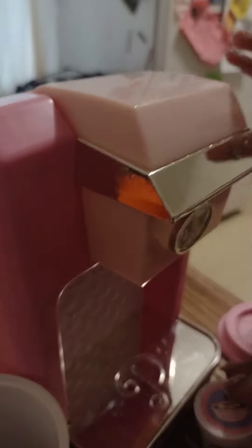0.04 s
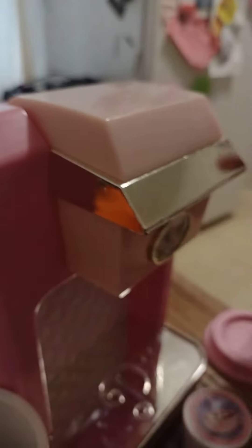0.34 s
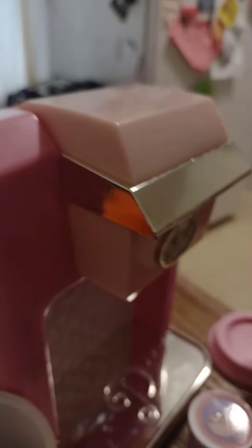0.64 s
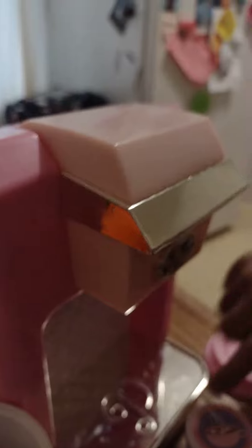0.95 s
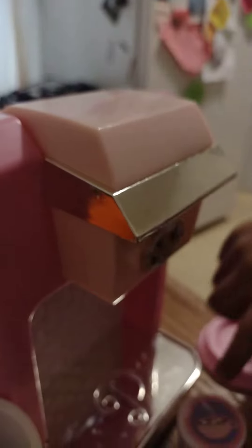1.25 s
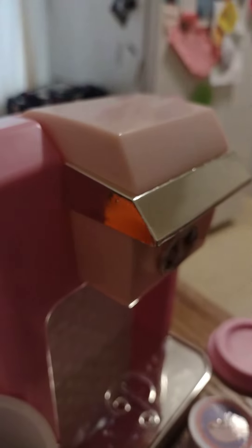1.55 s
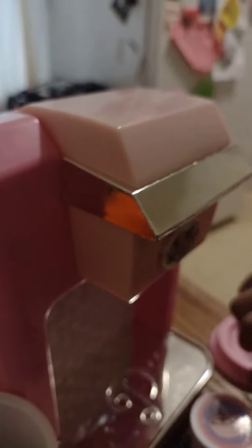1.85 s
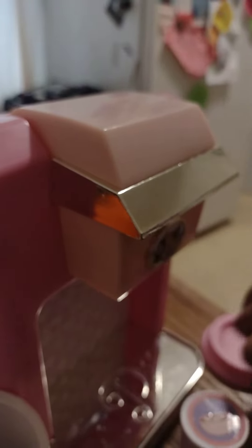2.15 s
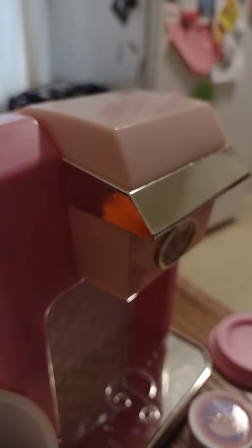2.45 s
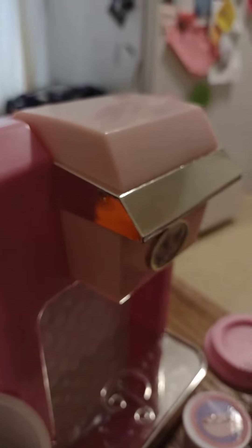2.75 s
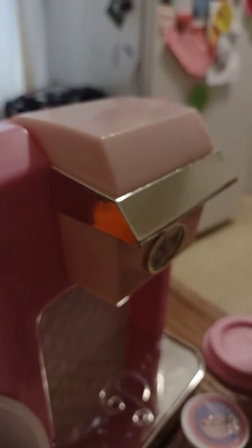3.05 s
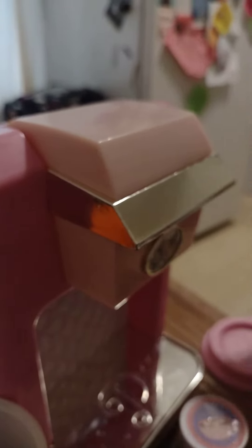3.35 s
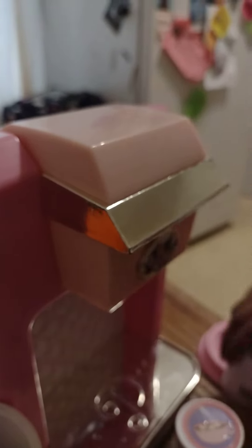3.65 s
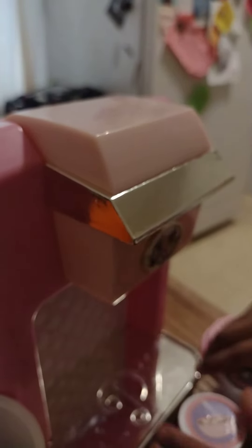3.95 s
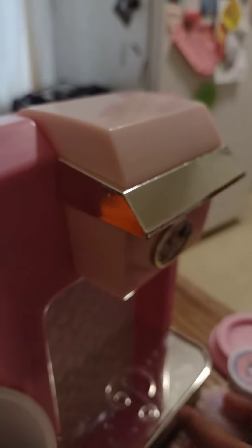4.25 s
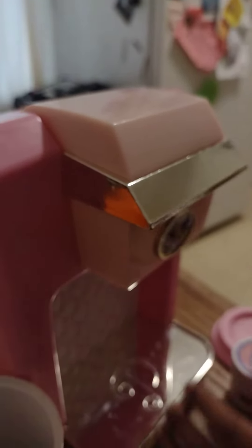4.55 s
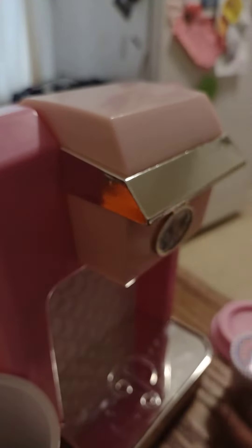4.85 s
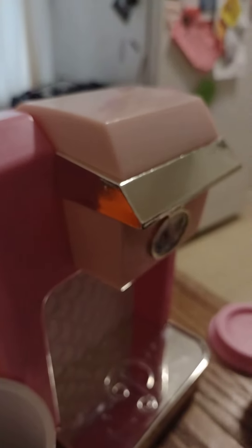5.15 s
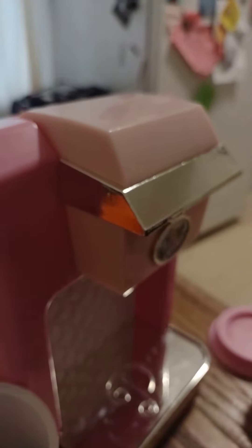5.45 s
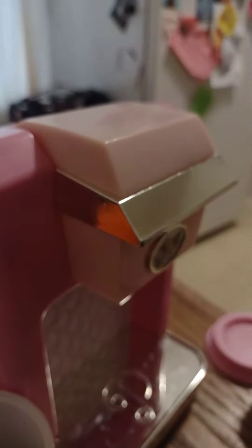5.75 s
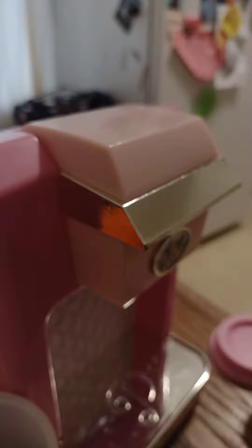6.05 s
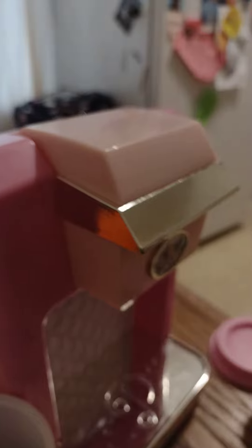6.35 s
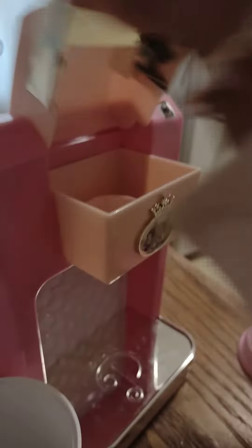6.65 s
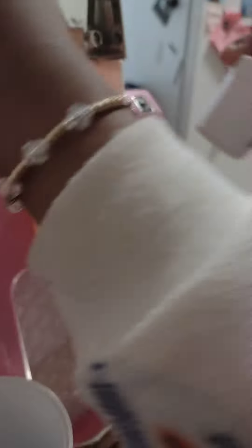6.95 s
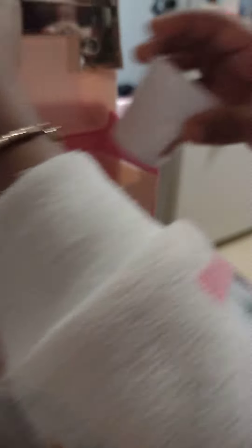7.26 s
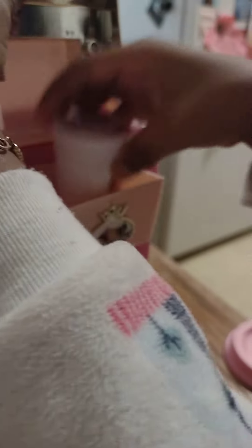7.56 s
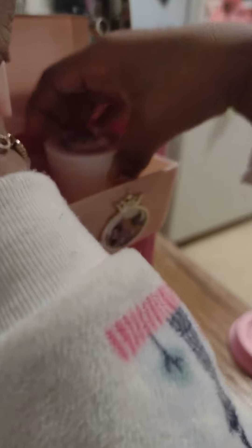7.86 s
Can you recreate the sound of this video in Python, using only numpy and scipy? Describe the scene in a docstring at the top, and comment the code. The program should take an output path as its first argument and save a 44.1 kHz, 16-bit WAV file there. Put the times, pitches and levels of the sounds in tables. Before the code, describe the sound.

An appliance hums faintly in a small kitchen while light taps land on a plastic coffee machine. Hard plastic pods then clatter in a hand, one clicks on a lid, and they bounce sharply on a wooden table as a hand bumps and drags close to the microphone. After a brief dropout, dull knocks sound in the machine's hollow holder, and a pod clicks on the rim and slides in.

```python
"""An appliance hums faintly while light taps land on a small plastic coffee machine and a sleeve brushes by.
After four seconds hard plastic pods clatter in a hand, one clicks on a lid, and they bounce on a wooden
table as the hand bumps and drags close by. Each hit is a short crack, most with a brief ring, echoing in
a small kitchen. Near seven seconds all sound drops out for a moment. Last come dull knocks in the
machine's hollow holder, and a pod clicks on its rim and slides in."""
import sys
import numpy as np
from scipy import signal
from scipy.fft import rfft, irfft, next_fast_len
from scipy.io import wavfile
from scipy.ndimage import uniform_filter1d, map_coordinates

SR = 44100
rng = np.random.default_rng(int(sys.argv[2]) if len(sys.argv) > 2 else 0)


def unload_audio(sound):
    """Save the sound as a 16-bit wav file, at the path given as the first command line argument."""
    columns = np.transpose(np.atleast_2d(sound))
    # keep every value between -1 and 1, then stretch to whole-number steps
    steps = np.round(np.clip(columns, -1, 1) * 32767)
    wavfile.write(sys.argv[1], SR, steps.astype(np.int16))


N = 352976

# pods hitting each other: (time [s], level [dB], brightness [dB/octave], clink pitch [Hz], clink [dB])
POD_HITS = [(4.336, -32, 2, 4120, -52.5), (4.381, -39, -0.5, 4130, -61), (4.415, -47, -2, 4150, -61),
            (4.457, -15.5, -2, 4930, -36), (4.519, -13.5, -0.5, 4300, -34.5),
            (4.531, -14.5, -3.5, 4300, -45), (4.586, -15, -3.5, 4310, -46), (4.613, -11.5, -2, 4960, -41),
            (4.636, -19, -3.5, 4130, -47), (4.657, -17.5, -4, 4900, -36.5), (4.684, -18.5, -4, 4950, -47),
            (4.698, -22.5, -5, 4300, -58), (4.764, -38.5, -1, 4950, -65), (4.791, -41, 14, 7150, -64)]
# tone colour of a hit on the table: (frequency [Hz], level [dB])
TABLE_COLOUR = [(50, -28.5), (90, -16), (180, -14.5), (400, -6.5), (900, 0), (1300, 0.5), (1900, 0.5),
                (2700, -8.5), (4150, -11), (5000, -13.5), (6000, -18), (7100, -11), (8400, -32.5)]


def amp(db):
    """Turn decibels into a gain."""
    return 10 ** (np.asarray(db) / 20)


def unit(x):
    """Scale a sound to an average (rms) level of 1."""
    return x / np.sqrt(np.mean(x ** 2) + 1e-20)


def along(points, hz):
    """Read between (frequency, value) points on a log frequency axis."""
    freqs, values = np.transpose(points)
    return np.interp(np.log(hz + 1), np.log(freqs + 1), values)


def wobble(rate):
    """A smooth curve through rate random values a second."""
    return map_coordinates(rng.standard_normal(int(N * rate / SR) + 4), [np.arange(N) * rate / SR])


def filtered(x, response):
    """Turn each frequency up or down by its own gain."""
    size = next_fast_len(N + SR // 2)
    return irfft(rfft(x, size) * response(np.fft.rfftfreq(size, 1 / SR)), size)[:N]


def coloured(x, colour):
    """Give a sound a tone colour, at average level 1."""
    return unit(filtered(x, lambda hz: amp(along(colour, hz))))


def add(out, s, sound):
    """Mix a sound into out at s seconds."""
    out[max(round(s * SR), 0):][:len(sound)] += sound


def narrow_noise(centre_hz, width_hz):
    """Noise squeezed around one pitch: a fuzzy tone."""
    noise = rng.standard_normal(N)
    return unit(filtered(noise, lambda hz: 1 / (1 + (2 * (hz - centre_hz) / width_hz) ** 2)))


def appliance(air_db=-66, waver_db=-1.27, drift_radians=0.087):
    """A slightly unsteady electric hum and a fuzzy whine over the soft rush of the room."""
    # steady tones: the mains hum and two high lines of the whine: (pitch [Hz], level [dB])
    hum_tones = [(59.2, -63), (118.4, -75), (296.1, -87.5), (354, -64.5), (412.5, -66.5), (468.3, -82.5),
                 (2708, -88), (2767, -94.5)]
    # tones of the whine: (pitch [Hz], width [Hz], level [dB])
    whine_tones = [(2090, 50, -91.5), (4820, 70, -94), (5000, 30, -94)]
    # colour of the room's rush: (frequency [Hz], level [dB])
    air_colour = [(20, -40.5), (35, -23), (60, -4), (110, -13), (260, -10), (400, -15), (470, -16.5),
                  (600, -20.5), (1600, -28.5), (2300, -34), (4000, -34.5), (5000, -33.5), (7000, -34),
                  (8400, -46.5)]
    t = np.arange(N) / SR
    hum = np.zeros(N)
    for hz, db in hum_tones:
        level = amp(db + waver_db * wobble(12))
        hum += level * np.sin(2 * np.pi * (hz * t + rng.random()) + drift_radians * wobble(1.1))
    whine = sum(amp(db) * narrow_noise(hz, width_hz) for hz, width_hz, db in whine_tones)
    return np.sqrt(2) * hum + whine + amp(air_db) * coloured(rng.standard_normal(N), air_colour)


def lead_in(pulse, length_s):
    """A faint, very short swell of noise leads into each hit."""
    t = np.arange(SR // 50) / SR
    swell = signal.fftconvolve(rng.standard_normal(len(t)) * t * (t < length_s), pulse)
    return swell / np.linalg.norm(swell)


def crack(colour, tilt_db, size=4096):
    """The sharp pulse of one hit; tilt_db brightens it by that much per octave."""
    hz = np.fft.rfftfreq(size, 1 / SR)
    octaves = np.log2(np.clip(hz, 200, 8000) / 1500)
    level = np.maximum(along(colour, hz), -50) + tilt_db * octaves
    # keep the colour but pack the energy at the start (minimum phase)
    cepstrum = irfft(np.log(amp(level)))
    cepstrum[1:size // 2] *= 2
    cepstrum[size // 2 + 1:] = 0
    pulse = irfft(np.exp(rfft(cepstrum)))
    return pulse / np.linalg.norm(pulse)


def ringing(tones, t, tilt_db=0, scatter_db=1.0, blur_hz=20):
    """Each tone fades 60 dB in its ring time, t60, and is a little fuzzy, like a ring heard in a room."""
    ring = np.zeros(len(t))
    for hz, db, t60 in tones:
        blur = np.cumsum(rng.standard_normal(len(t))) * np.sqrt(2 * np.pi * blur_hz / SR)
        tone = np.sin(2 * np.pi * hz * t + blur) * amp(-60 * t / t60) * (1 - np.exp(-t / .001))
        strength = amp(db + tilt_db * np.log2(hz / 1500) + scatter_db * rng.standard_normal())
        ring += strength * tone / np.linalg.norm(tone)
    return ring


def surfaces(spread_s=0.013, strength=0.11, count=7):
    """Sound arrives directly, then as a few quick echoes off the table top and the machine."""
    paths = np.zeros(SR // 20)
    paths[0] = 1
    delays = rng.uniform(.1, 1, count) * spread_s
    paths[(delays * SR).astype(int)] += strength * rng.choice([-1, 1], count)
    return paths / np.linalg.norm(paths)


def kitchen(build_up_s=0.00049, early_t60=0.11):
    """Dense echoes: near walls answer briefly, then the room, where the treble dies first."""
    # how long the room echoes: (frequency [Hz], time to fade 60 dB [s])
    echo_times = [(150, 0.32), (450, 0.38), (1100, 0.29), (2700, 0.32), (7200, 0.25)]
    hz, t, noise = signal.stft(rng.standard_normal(SR // 2), SR, nperseg=256)
    fade = np.hypot(amp(-60 * t / along(echo_times, hz)[:, None]), amp(-60 * t / early_t60))
    tail = signal.istft(noise * fade * (1 - np.exp(-t / build_up_s)), SR, nperseg=256)[1]
    return tail / np.linalg.norm(tail)


def contacts(hits, colour, tones, gain_db, room_db, ring_db=0, chatter=.15, chatter_t60=.008,
             room_growth=0, crisp_db=0, detune=0, lead_in_s=0.0016, lead_in_db=-20):
    """Each hit cracks, rings its object's tones and echoes; crisp_db brightens the direct part."""
    out, t = np.zeros(N + 2 * SR), np.arange(SR // 2) / SR
    nearby = surfaces()
    hardest_db = max(row[1] for row in hits)
    for (s, db, tilt_db, *_), echo_db in zip(hits, np.broadcast_to(room_db, len(hits))):
        pulse = crack(colour, tilt_db)
        # thin walls chatter as they meet
        force = chatter * rng.standard_normal(len(t)) * amp(-60 * t / chatter_t60)
        force[0] += 1
        direct = signal.fftconvolve(force, crack(colour, tilt_db + crisp_db))[:len(t)]
        # a hard blow shakes its surroundings more
        hit = amp(echo_db + room_growth * (db - hardest_db)) * signal.fftconvolve(pulse, kitchen())
        hit[:len(t)] += direct / np.linalg.norm(direct)
        hit = signal.fftconvolve(hit, nearby)
        # detune shifts the pitches from hit to hit; a soft hit rings the high tones less
        retuned = [(hz * (1 + detune * rng.standard_normal()), level, t60) for hz, level, t60 in tones]
        hit[:len(t)] += amp(ring_db) * ringing(retuned, t, min(tilt_db, 0))
        add(out, s, amp(db + gain_db) * hit)
        add(out, s - lead_in_s, amp(db + gain_db + lead_in_db) * lead_in(pulse, lead_in_s))
    return out[:N]


def machine_taps():
    """Light taps of plastic make the machine's shell ring."""
    # taps: (time [s], level [dB], brightness [dB/octave])
    taps = [(0.002, -30.5, -2), (0.167, -30.5, -1), (0.250, -40, -2), (0.325, -49, -5.5),
            (3.819, -20.5, 0.5), (3.972, -36.5, -1), (4.0275, -40.5, -4.5)]
    # the shell's colour: (frequency [Hz], level [dB])
    colour = [(60, -23), (240, -12), (600, 0.5), (1080, -6.5), (1350, -1), (1900, 1.5), (2500, -6),
              (3100, -17), (3700, -11.5), (4500, -18.5), (5100, -18.5), (6000, -34.5), (7000, -18.5),
              (8400, -28)]
    # its tones: (pitch [Hz], level [dB], ring time [s])
    tones = [(251.5, -24.5, 0.29), (1080, -16, 0.24), (1604, -19, 0.14), (1856, -13, 0.14),
             (3730, -16.5, 0.16)]
    return contacts(taps, colour, tones, gain_db=12.5, room_db=1.5, room_growth=0.081, ring_db=7,
                    chatter=0.2, chatter_t60=0.022, crisp_db=3.0, detune=.006)


def plastic_flexes():
    """Thin plastic clicks as it bends under a finger."""
    # bends: (time [s], level [dB], brightness [dB/octave])
    flexes = [(0.515, -50, -8.5), (1.652, -50.5, -2)]
    # the thin wall's colour: (frequency [Hz], level [dB])
    colour = [(500, -24), (1800, -23), (2700, 2), (3500, -5), (4600, -19)]
    return contacts(flexes, colour, [], gain_db=10.5, room_db=-18, chatter=0.2, chatter_t60=0.01)


def strokes(rows, attack_s, release_s):
    """Loudness of rubbing: each stroke gathers speed, holds and dies away."""
    t = np.arange(N) / SR
    power = np.zeros(N)
    for start, length, db in rows:
        rise = np.clip((t - start) / attack_s, 0, 1)
        fall = np.exp(-np.maximum(t - start - length, 0) / release_s)
        power += (amp(db) * rise * fall) ** 2
    return np.sqrt(power)


def slips(grain_db, rate):
    """Friction: noise broken into tiny uneven slips, rate of them a second."""
    return rng.standard_normal(N) * amp(grain_db * wobble(rate))


def sleeve_brushes():
    """A sleeve brushes past with a fine hiss."""
    # strokes: (start [s], length [s], level [dB])
    brushes = [(0.66, 0.035, -81), (1.09, 0.047, -73.5), (2.87, 0.14, -75.5), (4.96, 0.095, -68.5),
               (5.6, 0.3, -68), (5.94, 0.078, -55), (6.08, 0.73, -67.5), (6.94, 0.22, -80),
               (7.12, 0.028, -69.5)]
    # the cloth's colour: (frequency [Hz], level [dB])
    colour = [(1500, -5), (3500, -12.5), (5300, -5), (6200, -4.5), (7100, -2.5), (8000, -19), (8600, -33.5)]
    hiss = coloured(slips(grain_db=1.0, rate=130), colour)
    return strokes(brushes, attack_s=0.0081, release_s=0.08) * hiss


def close_ticks():
    """Dry ticks, so close that they have almost no echo."""
    # ticks: (time [s], level [dB], brightness [dB/octave])
    ticks = [(2.119, -55.5, 8), (5.835, -49, 18), (5.902, -52, 12), (6.024, -32.5, 24),
             (6.539, -33.5, -2.5)]
    return contacts(ticks, TABLE_COLOUR, [], gain_db=14, room_db=-23, chatter=0)


def pod_clatter():
    """Pods knock against each other in the hand."""
    # a pod's colour: (frequency [Hz], level [dB])
    colour = [(60, -36), (250, -11.5), (550, -3), (850, -1.5), (2000, 2), (2600, -6), (3300, -19),
              (3900, -15), (4250, -16.5), (4600, -24), (4950, -21.5), (6000, -20), (7100, -17.5),
              (8400, -34.5)]
    # its tones: (pitch [Hz], level [dB], ring time [s])
    tones = [(4160, -14.5, 0.23), (5000, -22.5, .12), (7160, -17.5, 0.029)]
    return contacts(POD_HITS, colour, tones, gain_db=8.5, room_db=3.0, room_growth=0.39, ring_db=1.5,
                    chatter=0.87, chatter_t60=0.0067, crisp_db=2, detune=.008)


def pod_clinks(t60=0.11):
    """Each struck spot on a pod's rim gives its own short high tone."""
    out, t = np.zeros(N + SR), np.arange(SR // 2) / SR
    for s, _, _, hz, db in POD_HITS:
        tone = ringing([(hz, 0, t60)], t, blur_hz=15)
        add(out, s, amp(db) * tone / np.abs(tone).max())
    return out[:N]


def hand_bumps(t60=0.12, attack_s=0.0045):
    """Soft bumps of the hand carry to the microphone as low thuds."""
    # bumps: (time [s], level [dB], pitch [Hz])
    bumps = [(4.54, -55.5, 70), (4.62, -40.5, 64.6), (5.445, -27, 107), (5.463, -32, 76),
             (5.487, -28.5, 58), (6.013, -32.5, 102.4), (6.056, -35, 65.5)]
    out, t = np.zeros(N + SR), np.arange(SR // 2) / SR
    for s, db, hz in bumps:
        add(out, s, amp(db - 60 * t / t60) * (1 - np.exp(-t / attack_s)) * np.sin(2 * np.pi * hz * t))
    return out[:N]


def lid_clicks():
    """A pod clicks against a plastic lid, which rings."""
    # clicks: (time [s], level [dB], brightness [dB/octave])
    clicks = [(4.862, -19, 2.5), (4.870, -20.5, -3.5)]
    # the lid's colour: (frequency [Hz], level [dB])
    colour = [(100, -24.5), (330, -19), (620, -8), (1020, -11.5), (1420, 0), (2000, -4), (2900, -24),
              (3370, -7), (3850, -20.5), (4900, -16.5), (5350, -11.5), (5800, -19.5), (6700, -23),
              (7300, -17), (8400, -32)]
    # its tones: (pitch [Hz], level [dB], ring time [s])
    tones = [(1422, 4, .17), (1560, -6.5, .2), (3360, -3.5, .23), (4091, -11, 0.27), (4500, -11, 0.14),
             (5380, -10.5, .12), (7300, -8.5, 0.1)]
    return contacts(clicks, colour, tones, gain_db=7.5, room_db=4.0, ring_db=1.5,
                    chatter=0.6, chatter_t60=0.014)


def table_drops():
    """Pods strike the wooden table, bounce and settle."""
    # landings: (time [s], level [dB], brightness [dB/octave], room echo [dB])
    drops = [(5.1221, -1.5, 1, -1.5), (5.132, -13.5, -1, 4), (5.144, -11, 1, 3.5), (5.166, -15.5, 0.5, 3.5),
             (5.234, -25.5, 0.5, 1), (5.293, -33, -5.5, 0), (5.3994, -6, 0.35, 2), (5.423, -16, -1.5, -2),
             (5.493, -13.5, -2.5, -4), (5.538, -19, -4, -1.5), (5.644, -36, -7, 2),
             (5.757, -41.5, -3.5, -2), (5.919, -42, -6.5, 0), (6.191, -41.5, -12, 1.5),
             (6.210, -42.5, -4.5, -8), (6.247, -50, 0, -5)]
    # the table's tones: (pitch [Hz], level [dB], ring time [s])
    tones = [(515.5, -11, .28), (896, -8, 0.27), (1110, -9, 0.11), (1380, -8, 0.19), (1732, -10, 0.2),
             (2090, -14.5, 0.3), (4190, -17, 0.14), (7080, -17.5, 0.14)]
    return contacts(drops, TABLE_COLOUR, tones, gain_db=13.0, room_db=[row[3] for row in drops],
                    ring_db=-4.5, chatter=0.28, chatter_t60=0.007, crisp_db=0.62,
                    lead_in_s=0.0039, lead_in_db=-21.5)


def hand_drags():
    """A hand drags over the wood with a grainy scrape."""
    # strokes: (start [s], length [s], level [dB])
    drags = [(5.58, 0.11, -50), (5.77, 0.11, -57), (5.925, 0.21, -58), (6.19, 0.062, -55),
             (6.33, 0.677, -68.5), (6.93, 0.28, -69.5), (7.92, 0.12, -64)]
    # the scrape's colour: (frequency [Hz], level [dB])
    colour = [(150, -38), (350, -0.5), (700, 3), (1100, -5), (1500, -6), (2200, -13.5), (3000, -26),
              (5000, -24.5)]
    scrape = coloured(slips(grain_db=3.5, rate=400), colour)
    return strokes(drags, attack_s=0.015, release_s=0.04) * scrape


def holder_knocks():
    """Dull knocks ring in the hollow pod holder."""
    # knocks: (time [s], level [dB], brightness [dB/octave])
    knocks = [(7.310, -24.5, 0), (7.329, -29.5, -7), (7.379, -38.5, 3.5), (7.580, -45.5, -1)]
    # the holder's colour: (frequency [Hz], level [dB])
    colour = [(60, -27), (130, -13.5), (270, 0), (580, -3.5), (800, 1.5), (1250, -12.5), (1800, -13.5),
              (2050, -25), (2300, -14), (3000, -26.5), (4100, -31), (5300, -28), (6000, -32), (8000, -39)]
    # its tones: (pitch [Hz], level [dB], ring time [s])
    tones = [(251, -17, 0.21), (617, -17, 0.083), (811, -4, 0.056)]
    return contacts(knocks, colour, tones, gain_db=9.5, room_db=0, ring_db=-6,
                    chatter=0.41, chatter_t60=0.036, lead_in_db=-18)


def pod_into_holder():
    """A pod clicks on the holder's rim, then slides in and rubs the walls into ringing."""
    # touches on the rim: (time [s], level [dB], brightness [dB/octave])
    touches = [(7.692, -42.5, 0), (7.699, -45.5, 2), (7.775, -51, -6)]
    # the rim's colour: (frequency [Hz], level [dB])
    colour = [(100, -22), (550, 3), (1000, -4), (1450, 0), (2500, 0.5), (3000, -11), (3900, -18),
              (4500, -18.5), (6800, -19), (8400, -38)]
    # its tones: (pitch [Hz], level [dB], ring time [s])
    tones = [(1287, -23, .02), (1453, -5.5, 0.055), (2160, -24, 0.055), (2470, -7, 0.026),
             (3597, -9.5, 0.07), (3950, -9, 0.075)]
    # the slide: (start [s], length [s], level [dB])
    slides = [(7.85, 0.18, -67)]
    clicks = contacts(touches, colour, tones, gain_db=14, room_db=0.5, ring_db=-1.5,
                      chatter=0.54, chatter_t60=0.022)
    friction = slips(grain_db=4.0, rate=100)
    ring = ringing(tones, np.arange(SR // 4) / SR, tilt_db=-7.5, blur_hz=120)
    walls = unit(signal.fftconvolve(friction, ring)[:N])
    return clicks + strokes(slides, attack_s=0.046, release_s=0.046) * walls


def scene():
    """All the sounds as they reach one microphone."""
    plastic = machine_taps() + pod_clatter() + lid_clicks() + table_drops() + holder_knocks()
    plastic += close_ticks() + plastic_flexes() + pod_clinks() + pod_into_holder()
    return (plastic + hand_bumps() + hand_drags() + sleeve_brushes() + appliance())[None]


def record(dry, ceiling=.85, top_hz=8500, silence_s=(6.656, 6.936)):
    """The microphone rounds the hardest peaks and loses the top treble; the sound cuts out once."""
    # the microphone's colour, with a small treble peak: (frequency [Hz], gain [dB])
    microphone = [(22, -13), (45, 0.5), (4800, 1), (6000, 0), (7200, 1.5), (7700, 2), (8100, -10)]
    t = np.arange(N) / SR
    heard = filtered(dry[0], lambda hz: amp(along(microphone, hz)))
    heard = heard / (1 + (heard / ceiling) ** 4) ** .25
    heard = filtered(heard, lambda hz: np.clip((top_hz - hz) / 200, 0, 1))
    sound_on = (t < silence_s[0]) | (t > silence_s[1])
    return (heard * uniform_filter1d(sound_on.astype(float), size=88))[None]  # 2 ms fades


dry = scene()
out = record(dry)
unload_audio(out)
```